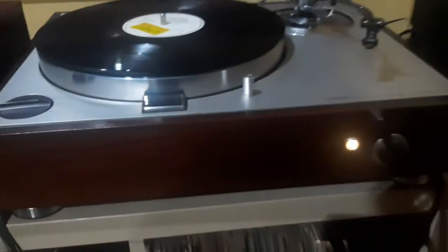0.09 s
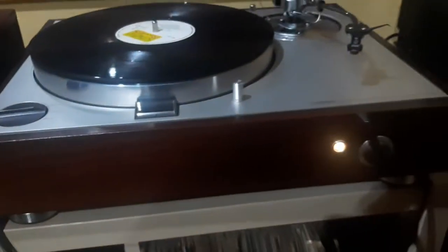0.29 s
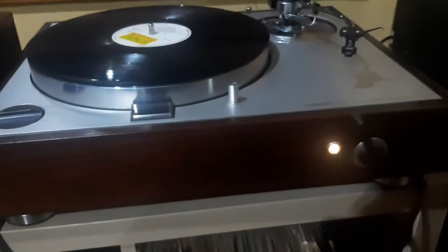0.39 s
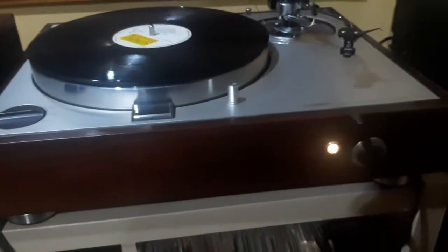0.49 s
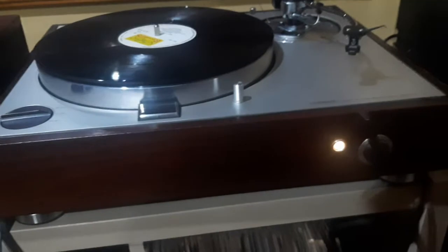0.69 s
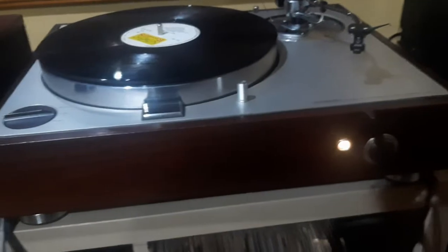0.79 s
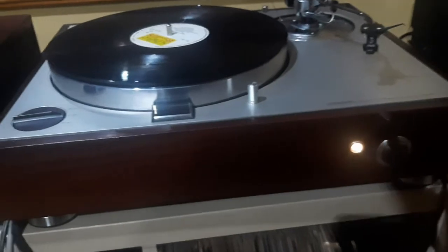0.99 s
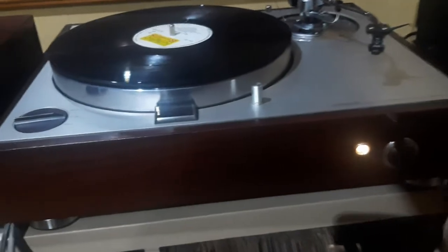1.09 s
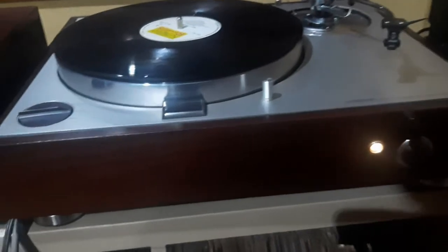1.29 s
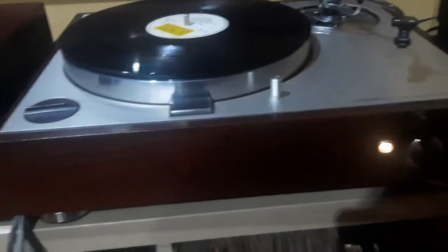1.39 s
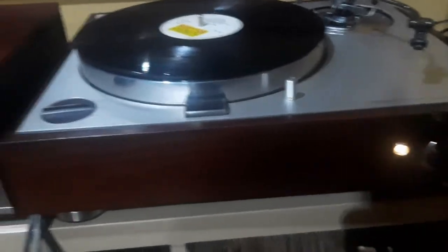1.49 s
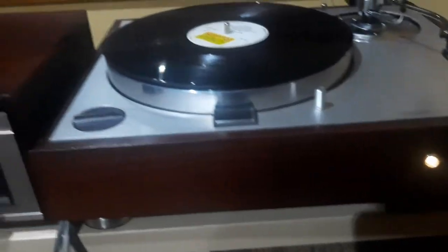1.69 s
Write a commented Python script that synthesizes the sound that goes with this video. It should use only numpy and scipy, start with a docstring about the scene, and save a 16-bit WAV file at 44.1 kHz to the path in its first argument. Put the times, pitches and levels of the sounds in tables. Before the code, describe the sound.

A record player's small suction pump runs throughout, close by in a quiet room, making paired, buzzy puffs about four times a second and slowing slightly. A lever rattles brightly at about 0.2 seconds, and a latch clunks home in the wooden cabinet at 0.4. Faint thin ticks sound on the left. From 1.1 seconds a soft rasp grows beneath the puffs, which continue until about 1.7.

```python
"""A quiet room, in which the small suction pump of a record player runs.
The pump strokes about four times a second, slowing as it loads; on each stroke the intake and
exhaust valves flutter, driving their resonances in short puffs. Early on, impacts excite the wooden
cabinet: a lever rattles and a latch clunks home. Faint thin ticks sound on the left, and a soft rasp
grows late in the run over the room's hush."""
import sys
import numpy as np
from scipy import signal
from scipy.fft import rfft, irfft
from scipy.io import wavfile

SR = 44100
rng = np.random.default_rng(int(sys.argv[2]) if len(sys.argv) > 2 else 0)


def file_out(sig):
    """Save sig as 16-bit WAV at sys.argv[1]."""
    # one column per channel
    cols = np.atleast_2d(sig).T
    # limit, then scale
    lim = np.clip(cols, -1, 1)
    pcm = np.round(lim * 32767).astype(np.int16)
    wavfile.write(sys.argv[1], SR, pcm)


N = 74970
LEAD = SR // 10   # samples before time zero, so an earlier impact can ring into the scene
TOTAL = N + LEAD

# pump strokes: (intake time [s], intake level [dB], exhaust time [s], exhaust level [dB])
PUMP_STROKES = [(0.043, 6.5, 0.11, 4), (0.2501, 2, 0.31, 5.5), (0.451, -3, 0.42, 10),
                (.658, 4.5, .7266, 0.5), (.881, 0, .946, 2.5), (1.1109, 2, 1.178, 2),
                (1.356, 2, 1.4225, 1.5), (1.6118, 2.5, 1.679, 2)]
# resonances of each valve: (frequency [Hz], level [dB], decay time T60 [s])
INTAKE_MODES = [(205, -48.5, 0.048), (291, -47.5, 0.06), (472, -62.5, 0.044), (893, -48.5, 0.021),
                (1132, -52, 0.04), (2233, -64.5, 0.022)]
EXHAUST_MODES = [(203, -50, 0.032), (311, -51, 0.08), (485, -58.5, 0.056), (656, -62.5, 0.042),
                 (1015, -48.5, 0.033), (1533, -54, 0.033), (2200, -69, 0.024)]
def pump():
    """Superposition of the direct valve puffs, a wall reflection of the intake and reverberation."""
    in_s, in_db, out_s, out_db = np.transpose(PUMP_STROKES)
    # the intake swells and shuts abruptly; the exhaust bursts and fades
    intake = valve(in_s, in_db, INTAKE_MODES, flutter_hz=178.46, rise_s=.016, fall_s=.004, jitter_s=7e-5)
    exhaust = valve(out_s, out_db, EXHAUST_MODES,
                    flutter_hz=205, rise_s=.006, fall_s=.0095, jitter_s=12e-5)
    echo_hz = 972
    echo_band = signal.butter(2, [echo_hz / 1.1, echo_hz * 1.1], "band", fs=SR, output="sos")
    echo = from_db(-6.5) * delayed(signal.sosfilt(echo_band, intake), delay_s=.032)
    puffs = low_cut(intake + exhaust, hz=115)
    direct = puffs + echo
    return np.array([delayed(direct, delay_s=.0002), direct]) + reverberation(puffs)


def valve(times, levels_db, modes, flutter_hz, rise_s, fall_s, jitter_s):
    """Flow-induced vibration: a flap's beats, and the turbulent air each lets by, drive resonances."""
    offsets = np.arange(-5, 6) / flutter_hz
    flow = np.exp(-(offsets / np.where(offsets < 0, rise_s, fall_s)) ** 2)
    scatter = rng.standard_normal((len(times), 2, len(offsets)))
    beat_times = times[:, None] + offsets + jitter_s * scatter[:, 0]
    beat_gains = from_db(levels_db[:, None] + .5 * scatter[:, 1]) * flow
    beats = clicks(beat_times.ravel(), beat_gains.ravel())
    turbulence = low_cut(rng.standard_normal(TOTAL), hz=300)
    drive = beats + .026 * decay(beats, tau_s=.007) * turbulence
    return sum((-1) ** k * from_db(db) * ring(drive, hz, t60) for k, (hz, db, t60) in enumerate(modes))


# impacts: (time [s], rattle level [dB], low-mode level [dB], high-mode level [dB])
LEVER_IMPACTS = [(-.045, -2, -24, -21), (.2185, -8.5, -25, -3), (.2285, -3, -19, -3.5),
                 (.2415, -5, 3.5, -2), (.2525, -28, 0.5, 1.5), (.2595, -12.5, -10, -1)]
LATCH_IMPACTS = [(.4072, -1, -2, -9), (.4168, -2, 3.5, 0), (.4435, -12, -7, -16)]
# dense ringing of the many small parts: (frequency [Hz], relative level [dB])
LEVER_SPECTRUM = [(40, -62), (90, -24.5), (200, -13.5), (300, -20), (480, -15.5), (900, -14.5),
                  (1080, -8.5), (1300, -20), (2000, -16.5), (3300, -21.5), (5100, -25), (7000, -44.5),
                  (11300, -45), (15500, -54)]
LATCH_SPECTRUM = [(40, -64), (70, -51), (113, -15), (158, -18), (206, -5), (341, -8.5), (551, -2.5),
                  (771, -12), (1050, -13), (1410, -18.5), (2000, -19), (3340, -26), (5200, -33.5),
                  (7200, -52.5), (12000, -54), (15500, -48)]
def lever_and_latch():
    """Impact excitation: the lever's bright rattle, then the latch's heavy clunk."""
    lever = rattle(LEVER_IMPACTS, LEVER_SPECTRUM, ring_db=-40.5, crack_db=-44.5, crack_s=.015)
    lever += cabinet(LEVER_IMPACTS, "lever")
    latch = rattle(LATCH_IMPACTS, LATCH_SPECTRUM, ring_db=-35, crack_db=-29.5, crack_s=.0052)
    latch += cabinet(LATCH_IMPACTS, "latch")
    return lever + latch


# damping of the small parts: (frequency [Hz], decay time T60 [s])
PARTS_DECAY = [(80, 1), (250, 0.51), (700, 0.45), (2000, 0.57), (5000, 0.28), (12000, 0.32)]
def rattle(impacts, spectrum, ring_db, crack_db, crack_s, contact_s=.0013):
    """Modal overlap: after each short crack, the small parts' many modes merge into decaying noise."""
    t = np.arange(SR) / SR
    onset = 1 - np.exp(-(t / contact_s) ** 2)
    envelope = (from_db(ring_db) + from_db(crack_db) * np.exp(-t / crack_s)) * onset
    return sum(convolve(clicks([when], from_db(db)), noise_tail(spectrum, PARTS_DECAY) * envelope)
               for when, db, _, _ in impacts)


# wooden cabinet: (frequency [Hz], decay time T60 [s], level from lever [dB], level from latch [dB])
CABINET_MODES = [(218, 0.21, -38, -34.5), (241, 0.18, -61, -37.5), (293.8, 0.75, -75, -53),
                 (373.5, 0.13, -56.5, -59), (439, 0.21, -84, -43), (460, 0.12, -105, -42),
                 (553.3, 0.19, -66, -44.5), (570, 0.11, -83, -38), (630.3, 0.11, -78, -43),
                 (669, 0.32, -78, -40), (985, 0.15, -48, -62), (1083, 0.25, -56, -42),
                 (1980, 0.16, -46.5, -47.5), (2380, 0.12, -49.5, -74), (2750, 0.43, -56, -83),
                 (3042, .35, -90, -56.5), (3500, 0.7, -66.5, -80)]
def cabinet(impacts, striker):
    """Free vibration: lever and latch excite the same normal modes in different proportions."""
    times, _, low_db, high_db = np.transpose(impacts)
    body = np.zeros(TOTAL)
    for k, (hz, t60, lever_db, latch_db) in enumerate(CABINET_MODES):
        mode_db = lever_db if striker == "lever" else latch_db
        strike_db = (low_db if hz < 800 else high_db) + rng.normal(0, .8, len(times))
        body += (-1) ** k * ring(clicks(times, from_db(mode_db + strike_db)), hz, t60)
    return low_cut(body, hz=192)


# thin ticks, and the fine crackle under them: (time [s], relative level [dB])
TICK_EVENTS = [(.1366, -6), (.155, -2), (.2274, 7), (0.252, 4), (.3411, -33), (0.3576, 0), (0.407, 10),
               (.4434, -2), (.461, -1), (0.545, -4), (0.6487, -5), (0.695, -1), (.7525, -7), (0.9573, 0),
               (0.972, -3), (1.046, -9), (1.056, -28), (1.0928, 4), (1.097, -4), (1.101, 1), (1.131, 0),
               (1.14, -20), (1.1616, -6), (1.1766, 2), (1.264, -9), (1.335, -6), (1.673, -3)]
CRACKLE_LEVELS = [(0, -44), (.2, -26), (.35, -15), (.6, -28), (.9, -42), (1.05, -19), (1.17, -29),
                  (1.28, -31), (1.6, -51)]
# spectrum of both: (frequency [Hz], relative level [dB])
TICK_SPECTRUM = [(2000, 9), (4200, -21), (5300, 1.5), (6500, -28), (9000, -24), (11000, 7.5), (13000, -1.5),
                 (15500, -1)]
def ticks(crackle_per_s=530, t60=.017):
    """Impulse-gated noise: timed ticks and a Poisson crackle each release a brief, bright burst."""
    times, db = np.transpose(TICK_EVENTS)
    arrivals = rng.random(TOTAL) < crackle_per_s / SR
    crackle = arrivals * np.abs(rng.standard_normal(TOTAL)) * gain_curve(CRACKLE_LEVELS)
    envelope = decay(clicks(times, from_db(db)) + crackle, tau_s=t60 / np.log(1000))
    return from_db(-54) * envelope * noise(TICK_SPECTRUM)


# swell of the rasp: (time [s], level [dB])
RASP_LEVELS = [(.9, -110), (1.08, -114), (1.12, -71), (1.22, -67), (1.29, -77), (1.35, -66), (1.43, -60),
               (1.52, -69), (1.6, -71.5), (1.7, -72)]
# its spectrum: (frequency [Hz], relative level [dB])
RASP_SPECTRUM = [(300, 0), (800, -7.5), (1400, -3.5), (1800, -7.5), (2300, -7), (2800, -19.5), (3600, -20),
                 (6000, -53)]
def rasp():
    """Amplitude-modulated noise: a soft rasp, probably the friction of something rubbing."""
    return gain_curve(RASP_LEVELS) * noise(RASP_SPECTRUM)


# absorption in the room: (frequency [Hz], reverberation time T60 [s])
ROOM_DECAY = [(100, 0.62), (300, 0.36), (1000, 0.26), (3000, 0.29), (12000, 0.12)]
# reverberant spectrum: (frequency [Hz], relative level [dB])
ROOM_SPECTRUM = [(50, 0), (105, 11), (180, -9), (230, -5), (320, 0), (450, 5), (650, 5), (950, -4),
                 (1500, -4), (2500, 1), (8000, -4)]
def reverberation(x, level_db=-8.5, build_s=.02):
    """Diffuse field: reflections build up, then die away by absorption."""
    t = np.arange(SR) / SR
    response = noise_tail(ROOM_SPECTRUM, ROOM_DECAY) * (1 - np.exp(-t / build_s))
    response /= np.sqrt(np.sum(response ** 2) / 2)   # unit mean energy per channel
    return from_db(level_db) * convolve(x, response)


# background of the room: (frequency [Hz], relative level [dB])
HUSH_SPECTRUM = [(25, -21), (45, -11), (90, 0), (180, -2), (350, -6), (600, -13), (1000, -16), (1400, -15),
                 (2300, -15), (2900, -21), (4200, -21), (5300, -18), (7300, -25), (9500, -23), (11000, -17),
                 (13000, -16), (15500, -24)]
def hush():
    """Stationary noise: the room's faint hush, strongest in the bass."""
    return from_db(-69) * noise(HUSH_SPECTRUM)


# likeness of left and right: (frequency [Hz], correlation [-1 to 1])
STEREO_CORRELATION = [(60, 1), (130, 0.81), (290, 0.82), (640, 0.5), (1400, -0.28), (3000, -0.17),
                      (15000, -0.3)]
def noise(spectrum):
    """Partial coherence: stereo noise of unit rms, alike in the bass, nearly unrelated in the treble."""
    hz = np.fft.rfftfreq(TOTAL, 1 / SR)
    mid, side = rfft(rng.standard_normal((2, TOTAL))) * from_db(at_hz(spectrum, hz))
    alike = at_hz(STEREO_CORRELATION, hz)
    x = irfft(np.sqrt(1 + alike) * mid + np.sqrt(1 - alike) * side * [[1], [-1]], TOTAL)
    return x / x.std()


def noise_tail(spectrum, t60s):
    """Frequency-dependent damping: one second of noise, each band dying at its own rate."""
    bins = rfft(noise(spectrum))
    hz, t = np.fft.rfftfreq(TOTAL, 1 / SR), np.arange(SR) / SR
    centres, times = np.transpose(t60s)
    tail = 0
    for share, t60 in zip(np.eye(len(times)), times):
        band = irfft(bins * at_hz(np.c_[centres, share], hz), TOTAL)[:, :SR]
        tail += band * np.exp(-np.log(1000) * t / t60)
    return tail


def ring(x, hz, t60):
    """Damped oscillator: a unit impulse starts a decaying sine of height 1."""
    r, w = np.exp(-np.log(1000) / (t60 * SR)), 2 * np.pi * hz / SR
    return signal.lfilter([0, np.sin(w)], [1, -2 * r * np.cos(w), r * r], x + 1e-18)


def clicks(times, gains):
    """Impulse train: one click of the given height at each time."""
    out = np.zeros(TOTAL)
    np.add.at(out, np.clip((np.asarray(times) * SR).astype(int) + LEAD, 0, TOTAL - 1), gains)
    return out


def decay(x, tau_s):
    """Leaky integration: each impulse fades exponentially."""
    return signal.lfilter([1], [1, -np.exp(-1 / (tau_s * SR))], x + 1e-18)


def low_cut(x, hz):
    """Second-order high-pass filtering."""
    return signal.sosfilt(signal.butter(2, hz, "high", fs=SR, output="sos"), x)


def delayed(x, delay_s):
    """Propagation delay: the same sound, later."""
    return np.interp(np.arange(TOTAL) - delay_s * SR, np.arange(TOTAL), x)


def convolve(x, response):
    """Convolution of a mono sound with a stereo impulse response."""
    return signal.fftconvolve(x[None], response, axes=1)[:, :TOTAL]


def gain_curve(points):
    """Amplitude envelope through (time [s], level [dB]) points."""
    return from_db(np.interp((np.arange(TOTAL) - LEAD) / SR, *np.transpose(points)))


def at_hz(points, hz):
    """Interpolation on a log-frequency axis."""
    frequencies, values = np.transpose(points)
    return np.interp(np.log(np.maximum(hz, 1)), np.log(frequencies), values)


def from_db(db):
    """Decibels to amplitude ratio."""
    return 10 ** (np.asarray(db) / 20)


def scene():
    """Linear superposition of all sources, heard from time zero."""
    return (pump() + lever_and_latch() + ticks() + rasp() + hush())[:, LEAD:]


# balance of the two microphones: (frequency [Hz], left minus right level [dB])
MICROPHONE_BALANCE = [(100, 2), (380, -0.2), (700, -0.3), (1300, -3), (2400, -13.5), (4400, 1), (8000, 3),
                      (15000, 9)]
def record(dry):
    """Frequency response: the microphones differ in colour at constant total power; the top is cut."""
    size, cutoff_hz = 2 * N, 15750
    balance_db = at_hz(MICROPHONE_BALANCE, np.fft.rfftfreq(size, 1 / SR))
    gains = from_db(balance_db * np.array([[.5], [-.5]]))
    gains /= np.sqrt(np.mean(gains ** 2, axis=0))
    heard = irfft(rfft(dry, size) * gains, size)[:, :N]
    return signal.sosfilt(signal.ellip(12, .1, 80, cutoff_hz, fs=SR, output="sos"), heard)


dry = scene()
out = record(dry)
file_out(out)
```